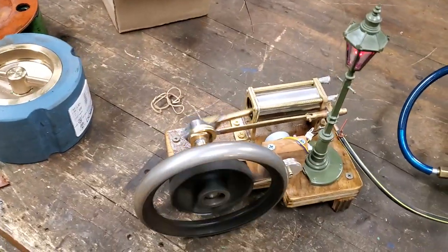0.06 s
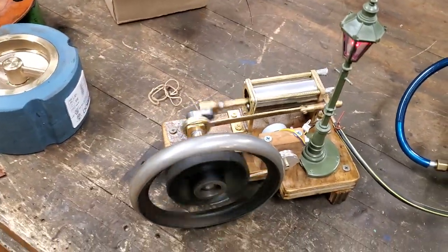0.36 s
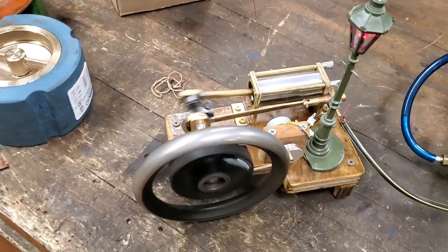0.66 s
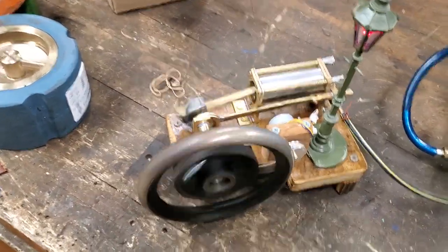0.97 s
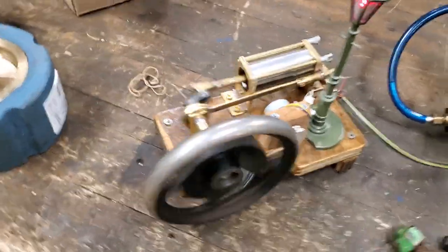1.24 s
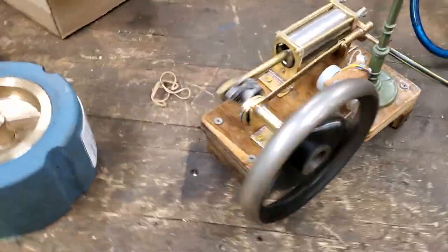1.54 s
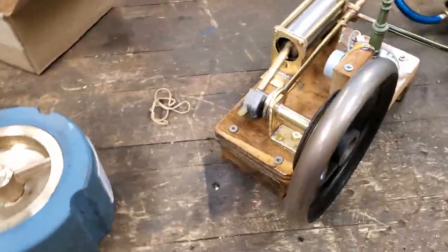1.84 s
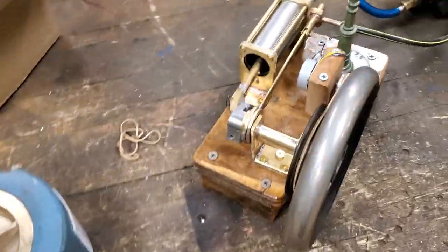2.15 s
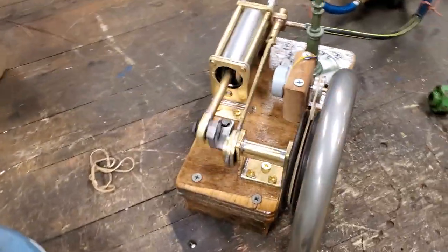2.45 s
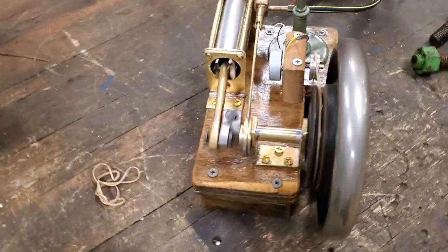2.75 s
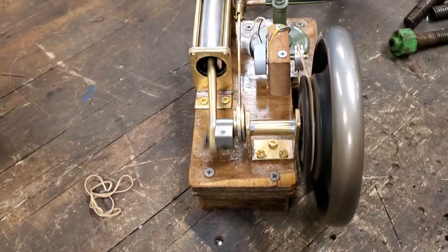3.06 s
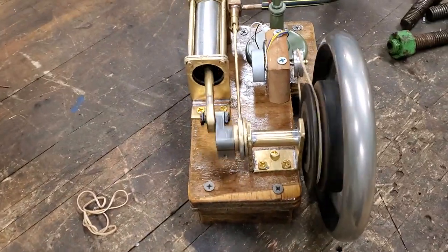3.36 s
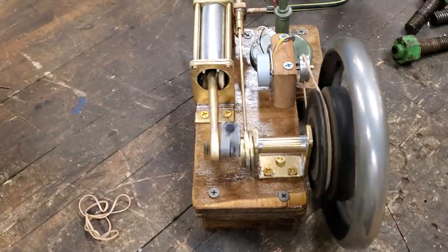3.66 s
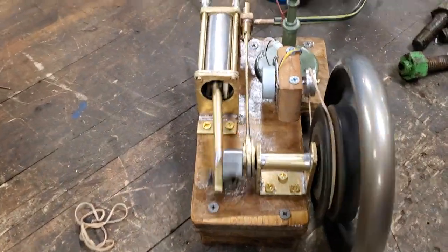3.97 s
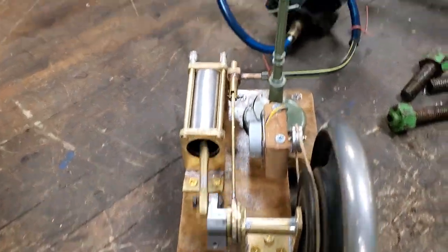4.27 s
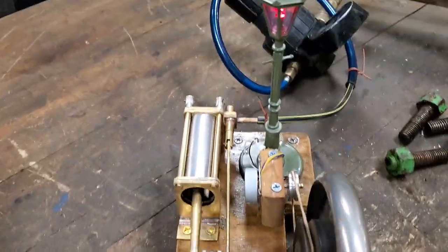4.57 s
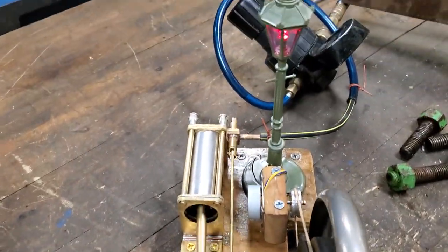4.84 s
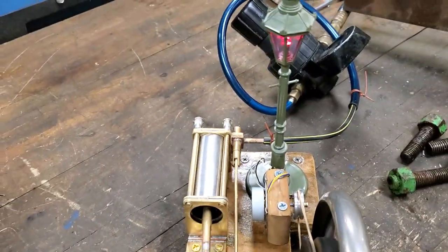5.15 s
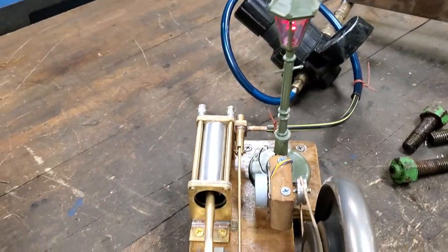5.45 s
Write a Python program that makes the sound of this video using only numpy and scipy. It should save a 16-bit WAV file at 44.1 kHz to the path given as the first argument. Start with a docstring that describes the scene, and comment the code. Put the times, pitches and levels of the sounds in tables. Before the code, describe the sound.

Quick, even chuffs of hissing air come from a little piston engine running nearby in a workshop. Each turn pairs a strong puff with a weak one, along with a brief valve squeak and ringing clicks from the brass frame. Underneath are a continuous low hum, rushing air and a faint high motor whine that swells now and then. The microphone circles close by, and the room adds a short echo.

```python
"""A small one-cylinder model steam engine runs on compressed air, about 340 turns a minute.
In each turn its valve squeaks, its exhaust puffs twice (strong, then weak) and its loose rod bearings
rattle the brass frame. Behind its wooden bench a workshop machine drones, with a rush of air and the
thin whine of a motor drive. The microphones move around the engine, and their automatic volume
control dips a little under each puff."""
import sys
import numpy as np
from scipy import signal
from scipy.fft import rfft, irfft, next_fast_len
from scipy.io import wavfile
from scipy.ndimage import map_coordinates

SR = 44100
rng = np.random.default_rng(int(sys.argv[2]) if len(sys.argv) > 2 else 0)


def wav_record(signal):
    """Record a signal, one row per channel, as 16-bit PCM in the file named by sys.argv[1]."""
    frames = np.transpose(np.atleast_2d(signal))
    bounded = np.clip(frames, -1, 1)
    # unit amplitude maps onto the largest positive 16-bit level
    quanta = np.round(bounded * 32767).astype(np.int16)
    wavfile.write(sys.argv[1], SR, quanta)


N = 247401
TIME = np.arange(N) / SR

# the notes the brass frame and rods ring at: (pitch [Hz], level [dB], time to fade 60 dB [s])
FRAME_NOTES = [(647, -4, 0.013), (932, -16, 0.056), (1117, 0.5, 0.028), (1327, 1, 0.04), (1493, 1, 0.027),
               (1584, -2.5, 0.031), (1660, -22, 0.044), (1968, -0.5, 0.026), (2353, -5.5, 0.048),
               (3000, -30, .025), (3534, -3.5, 0.08), (4030, 0.5, 0.03)]
# the crank is louder when the microphones are near: (time [s], level [dB])
CRANK_NEARNESS = [(0, 0), (1.2, -2), (2, 1.5), (2.7, 2), (3.5, 1), (4.5, 3), (5.6, 0.5)]
# the cylinder as the microphones move around it:
# (time [s], exhaust rush [dB], exhaust fizz [dB], exhaust left minus right [dB], valve squeak [dB])
CYLINDER_LEVELS = [(0, -28.5, -25.5, -3.3, -27), (1.1, -29, -25.5, -3, -27.5), (1.7, -31, -27, -4, -25.5),
                   (2.4, -27.5, -26.5, -5, -27), (2.95, -30, -28.5, -6, -24.5), (3.5, -27, -25, -5, -25),
                   (4.3, -26.5, -28, -3.3, -25.5), (4.9, -24.5, -25.5, -3, -29), (5.6, -28, -26.5, -4, -29)]


def amp(db):
    """Turn decibels into a gain."""
    return 10 ** (np.asarray(db) / 20)


def unit(x):
    """Scale a sound to an average (rms) level of 1."""
    return x / np.sqrt(np.mean(x ** 2) + 1e-20)


def along(points, hz):
    """Read between (Hz, value) points on a log scale."""
    f, v = np.transpose(points)
    return np.interp(np.log(hz + 1), np.log(f + 1), v)


def curves(rows):
    """One value per sample for each column after the time."""
    times, *columns = np.transpose(rows)
    return [np.interp(TIME, times, column) for column in columns]


def wobble(rate):
    """A smooth curve through `rate` random values a second."""
    points = rng.standard_normal(int(N * rate / SR) + 4)
    return map_coordinates(points, [TIME * rate], mode="nearest")


def filtered(x, response):
    """Scale each frequency of x by response(hz)."""
    size = next_fast_len(N + SR // 2)
    return irfft(rfft(x, size) * response(np.fft.rfftfreq(size, 1 / SR)), size)[..., :N]


def add(track, s, sound):
    """Mix a sound into a track at s seconds."""
    start = round(s * SR)
    a, b = max(start, 0), min(start + sound.shape[-1], N)
    if b > a:
        track[..., a:b] += sound[..., a - start:b - start]


def noise(spectrum, likeness):
    """Stereo noise with a given colour and left-right likeness."""
    def colour(hz):
        angle = np.arccos(np.clip(along(likeness, hz), -1, 1)) / 2
        return amp(along(spectrum, hz)) * [np.cos(angle), np.sin(angle)]
    mid, side = filtered(rng.standard_normal((2, N)), colour)
    return unit(np.array([mid + side, mid - side]))


def tone(hz):
    """A pure tone that follows a pitch."""
    return np.sqrt(2) * np.sin(2 * np.pi * (np.cumsum(hz * np.ones(N)) / SR + rng.random()))


def workshop(drone_db=3, rush_db=-26.5, echo_db=-5, waver_db=0.5):
    """A machine further off drones, booms and hums; its rush of air echoes in the room."""
    # the low drone and the rush of air: (frequency [Hz], level [dB])
    drone_colour = [(15, -45), (30, -28), (40, -9), (52, -10), (66, -2), (80, -4.5), (105, -4), (130, -0.5),
                    (160, -7.5), (205, -5), (250, -11), (300, -10), (350, -13.5), (420, -22), (600, -26),
                    (900, -34)]
    air_colour = [(240, -25), (400, -5.5), (800, -4), (1250, -4.5), (1500, 0.5), (1790, -5.5), (2000, -2.5),
                  (2630, 0.5), (3120, -1), (3950, -0.5), (4440, -6.5), (5900, -10), (7500, -18),
                  (9900, -18), (10900, -23.5), (15200, -19), (16200, -55)]
    # how alike left and right are: (frequency [Hz], likeness [1 = the same])
    likeness = [(100, 0.98), (250, 0.92), (500, 0.84), (1000, 0.054), (4000, -0.13), (12000, -0.13)]
    # the side the air leans to: (frequency [Hz], left minus right [dB])
    air_lean = [(1200, -1), (2000, 3), (3200, -0.5), (4400, 1.5), (6500, 2), (8000, -4), (15000, -6)]
    # the tones of the hum: (pitch [Hz], level [dB])
    hum_tones = [(49.5, -44.5), (59, -40), (91.6, -34.5), (204, -39.5), (234, -44), (337, -47), (360, -50),
                 (452, -59.5)]
    # the machine as the microphones move: (time [s], drone [dB], hum [dB])
    machine_levels = [(0, -31.5, -1.5), (1.4, -31, -4), (2.4, -30, 0.5), (4.2, -30.5, 1.5), (5.6, -32, 1)]
    low_db, hum_db = curves(machine_levels)
    drone = amp(low_db + drone_db) * noise(drone_colour, likeness)
    air = noise(air_colour, likeness)
    air = filtered(air, lambda hz: amp(along(air_lean, hz) * np.array([[1], [-1]]) / 2))
    rush = amp(rush_db + 0.47 * wobble(12)) * unit(air + amp(echo_db) * room(air))
    hum = sum(amp(db + hum_db + waver_db * wobble(1.466)) * tone(hz + .3 * wobble(1.95))
              for hz, db in hum_tones)
    return drone + boom() + rush + hum


def boom(pitch_hz=103.9, width_hz=19, rumble_db=-32.5, waver_db=3.0, swell_db=-1.5, edge_s=.025):
    """A low rumble of narrow noise that swells by chance, with nearby tones that beat together."""
    # the beating tones: (pitch [Hz], level [dB])
    boom_tones = [(96.4, -36.5), (100.5, -39), (112.9, -40.5), (120, -41.5), (126.2, -42)]
    # the low rumble's loudest random swells: (start [s], length [s], level [dB])
    swells = [(0.174, 0.034, -25), (0.277, 0.028, -23), (0.485, 0.046, -23.5), (0.729, 0.026, -24),
              (1.022, 0.028, -21), (1.259, 0.036, -20.5), (2.45, 0.052, -22.5), (3.003, 0.032, -22),
              (3.312, 0.055, -22.5), (3.706, 0.053, -19.5), (3.967, 0.03, -23), (4.201, 0.068, -20.5),
              (4.412, 0.047, -21.5), (4.869, 0.038, -24.5), (4.959, 0.066, -25), (5.188, 0.031, -22.5),
              (5.294, 0.036, -24), (5.399, 0.092, -19.5)]
    band = lambda hz: 1 / (1 + (2 * (hz - pitch_hz) / width_hz) ** 4)
    rumble = unit(filtered(rng.standard_normal(N), band))
    tones = sum(amp(db + waver_db * wobble(2)) * tone(hz) for hz, db in boom_tones)
    swell = sum(amp(db) * np.interp(TIME, [s - edge_s, s, s + length, s + length + edge_s], [0, 1, 1, 0])
                for s, length, db in swells)
    return amp(rumble_db) * rumble + tones + amp(swell_db) * swell * tone(pitch_hz)


def whine(level_db=-1, fade_db=2, whistle_db=-0.8, waver_hz=7, flicker_db=4, drift_hz=.4):
    """The motor drive whines; its tones swell as the microphones pass their loud spots in the room."""
    # tones made by the drive's fast switching: (pitch [Hz], level [dB])
    drive_tones = [(3833, -1), (3944, -4), (4055, -1), (4166, 4)]
    # loud and quiet spots on the way: (time [s], lowest tone [dB], upper tones [dB])
    swells = [(0, -45.0, -44.6), (0.95, -50.0, -48.5), (1.25, -35, -39), (1.47, -44, -48), (1.8, -39, -40),
              (2.15, -48.8, -41), (2.75, -51, -50), (3.1, -38, -49), (3.6, -30.5, -47), (4.3, -41, -41),
              (5.6, -46, -44.5)]
    # a thin, wavering whistle: (time [s], level [dB])
    whistle_levels = [(0, -36.5), (0.57, -47), (0.68, -33.5), (1.22, -41.5), (1.6, -49), (1.77, -35.5),
                      (2.05, -41.5), (2.3, -33.8), (2.6, -44), (2.9, -42), (3.6, -40), (3.95, -53.7),
                      (4.5, -43.9), (5.6, -47.0)]
    lowest_db, upper_db = curves(swells)
    drive = np.zeros((2, N))
    for k, (hz, db) in enumerate(drive_tones):
        at_mics = [amp(fade_db * wobble(2.52)) * tone(hz + drift_hz * wobble(1.495)) for _ in range(2)]
        drive += amp(db + level_db + (upper_db if k else lowest_db)) * np.array(at_mics)
    flicker = flicker_db * np.array([wobble(21.37), wobble(15)])
    whistle = amp(curves(whistle_levels)[0] + whistle_db + flicker) * tone(2686 + waver_hz * wobble(30))
    return drive + whistle


def room(x):
    """The room gives a short blur of echoes, different at each microphone."""
    # how long the echoes last: (frequency [Hz], time to fade 60 dB [s])
    fade_times = [(200, 0.22), (2000, 0.29), (12000, 0.29)]
    hz, t, spectrum = signal.stft(rng.standard_normal((2, SR // 2)), SR, nperseg=256)
    tail = signal.istft(spectrum * amp(-60 * t / along(fade_times, hz)[:, None]), SR, nperseg=256)[1]
    return signal.fftconvolve(x, tail / np.linalg.norm(tail[0]), axes=1)[:, :N]


def crank(first_squeak_s=0.0646):
    """Count the crank's turns, with zero at the first valve squeak."""
    # the flywheel: (time [s], speed [turns a minute])
    speed = [(0, 340.8), (1, 342.8), (2.4, 338.8), (3.4, 337.6), (5.6, 340.4)]
    turns = np.cumsum(curves(speed)[0]) / SR / 60
    return turns - np.interp(first_squeak_s, TIME, turns)


def turn_starts():
    """The times when the valve moves, once a turn."""
    turns = crank()
    return np.interp(np.arange(np.ceil(turns[-1])), turns, TIME)


def rubbing(level_db=-38, stroke_db=-0.5):
    """Sliding metal keeps the frame softly ringing, swelling with both strokes of each turn."""
    frame = lambda f: sum(amp(db) / (1 + 2j * np.pi * (f - hz) * fade_s / np.log(1000))
                          for hz, db, fade_s in FRAME_NOTES)
    ring = unit(filtered(rng.standard_normal((2, N)), frame))
    strokes = np.cos(2 * np.pi * 2 * crank())
    return amp(level_db + curves(CRANK_NEARNESS)[0] + stroke_db * strokes) * ring


def bearings(level_db=-34.5, jitter_s=.0012, tick_db=-8, force_vary_db=1.2, note_vary_db=1.5):
    """When the push changes direction, the loose rod ends knock and ring the frame."""
    # the knocks in each turn: (time after the valve moves [s], level [dB])
    knocks = [(.047, 2), (.057, 3.5), (.121, -1), (.129, 3.5), (.134, 1.5), (.14, 2.5)]
    out, t = np.zeros((2, N)), np.arange(SR // 10) / SR
    hz, db, fade_s = np.transpose(FRAME_NOTES)[:, :, None]
    attack = 1 - np.exp(-t / 0.00019)
    starts = turn_starts()
    for s in [2 * starts[0] - starts[1], *starts]:  # one turn is already under way
        for after, knock_db in knocks:
            late, force = rng.standard_normal(2)
            strength = amp(db + note_vary_db * rng.standard_normal(hz.shape) - 60 * t / fade_s)
            phase = 1.1 * rng.standard_normal((2, len(hz), 1))
            ring = (strength * np.sin(2 * np.pi * hz * t + phase)).sum(1)
            tick = amp(tick_db - 60 * t / 0.0083) * rng.standard_normal((2, len(t)))
            knock = amp(knock_db + force_vary_db * force) * (ring + tick) * attack
            add(out, s + after + jitter_s * late, knock)
    softened = filtered(out, lambda hz: 1 / (1 + 1j * hz / 6000))  # oil cushions each knock
    return amp(level_db + curves(CRANK_NEARNESS)[0]) * softened


def valve(level_db=2.0, vary_db=1.2, pitch_hz=2925, detune_hz=12, glide_hz=30, width_s=0.0035):
    """The sliding valve gives a short, rising squeak just before the port opens."""
    out, t = np.zeros((2, N)), np.arange(-SR // 50, SR // 20) / SR
    swell = np.exp(-(t / width_s) ** 2 / 2)
    ring_on = 0.29 * (t > 0) * amp(-60 * t / 0.16)
    shape = np.maximum(swell, ring_on)
    for s in turn_starts():
        detune, force = rng.standard_normal(2)
        hz = pitch_hz + detune_hz * detune + glide_hz * np.tanh(t / width_s)
        phase = 2 * np.pi * (np.cumsum(hz) / SR + rng.random()) + np.array([[0], [.7]])  # left, right
        add(out, s + t[0], amp(vary_db * force) * np.sqrt(2) * shape * np.sin(phase))
    return amp(level_db + curves(CYLINDER_LEVELS)[-1]) * out


def port_flow(t, attack_s=.0055, fall_db_per_s=800):
    """Air flow t seconds after the valve moves: the port opens fast, then the pressure drains."""
    # main puff, its after-blow, weak return puff, leak: (time [s], hold [s], level [dB])
    puffs = [(.009, 0.014, 0), (.03, 0.014, -9), (.091, .002, -10.5), (0.147, .002, -18)]
    rise = lambda s: np.exp(-(np.minimum(t - s, 0) / attack_s) ** 2 / 2)
    fall = lambda s: amp(-fall_db_per_s * np.maximum(t - s, 0))
    return np.sqrt(sum((amp(db) * rise(s) * fall(s + hold)) ** 2 for s, hold, db in puffs))


def exhaust(rush_db=1, fizz_db=4.5, vary_db=0.54, flutter_db=1.9, rush_pan=0.64):
    """Each puff is a fluttering jet of air that rushes in the passage and fizzes at its lip."""
    # the rush and the fizz: (frequency [Hz], level [dB])
    rush_colour = [(1500, -13), (2700, -8.5), (3400, 2.5), (4500, -3.5), (5600, 1.5), (6600, -1),
                   (7600, -6), (9500, -7), (11000, -24), (16000, -24)]
    fizz_colour = [(6000, -37), (8000, -26), (9600, -11), (11000, -13), (13000, -8), (14700, -3),
                   (15550, 3.5), (16200, -3.5)]
    flow, t = np.zeros(N), np.arange(-SR // 50, SR // 5) / SR
    for s in turn_starts():
        add(flow, s + t[0], amp(vary_db * rng.standard_normal()) * port_flow(t))
    low_db, high_db, pan_db, _ = curves(CYLINDER_LEVELS)
    sides_db = np.array([pan_db, -pan_db]) / 2
    flutter = amp(flutter_db * wobble(70))
    likeness = [(1000, 0.13)]  # left and right are barely alike
    rush = amp(low_db + rush_db + rush_pan * sides_db) * bench(noise(rush_colour, likeness))
    fizz = amp(high_db + fizz_db + sides_db) * bench(noise(fizz_colour, likeness))
    return flutter * (flow * rush + flow ** 1.04 * fizz)  # fizz grows a little faster with the flow


def bench(x, bounce=0.81, right_delay_ratio=1.13):
    """The hiss bounces off the bench top, and the late copy colours it."""
    # how late the echo reaches the moving left microphone: (time [s], delay [ms])
    echo_delays = [(0, 0.55), (1.2, 0.59), (2.2, 0.75), (3, 1.05), (4, 0.725), (4.6, 1.11), (5.6, 1.15)]
    delay = curves(echo_delays)[0] * SR / 1000
    samples = np.arange(N)
    echo = [np.interp(samples - delay * ratio, samples, side)
            for side, ratio in zip(x, (1, right_delay_ratio))]
    return unit(x + bounce * np.array(echo))


def scene(room_db=-11):
    """The engine close by, its echo in the room, and the workshop behind."""
    engine = exhaust() + valve() + bearings() + rubbing()
    return engine + amp(room_db) * room(engine) + workshop() + whine()


def record(dry, smooth_s=0.015, threshold_db=-11, top_hz=15850):
    """The volume control turns down while the treble is loud; the very highest sounds are cut off."""
    treble = np.mean(np.diff(dry, prepend=0) ** 2, axis=0)
    keep = np.exp(-1 / (smooth_s * SR))
    power = signal.lfilter([1 - keep], [1, -keep], treble)
    gain = 1 / np.sqrt(1 + power / amp(2 * threshold_db))
    return filtered(dry * gain, lambda hz: 1 / (1 + (hz / top_hz) ** 300))


dry = scene()
out = record(dry)
wav_record(out)
```